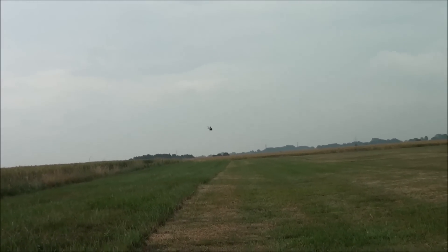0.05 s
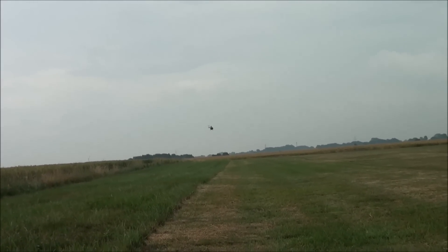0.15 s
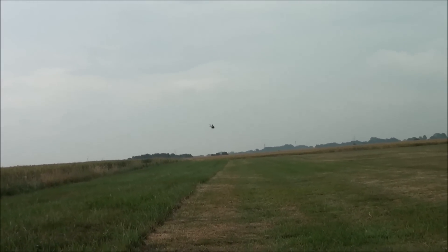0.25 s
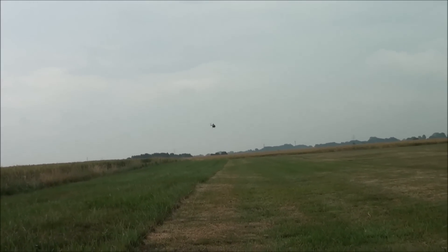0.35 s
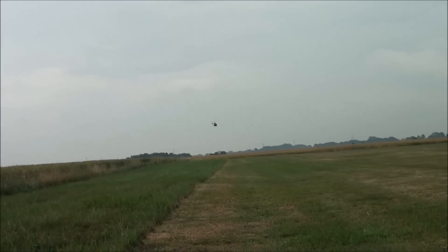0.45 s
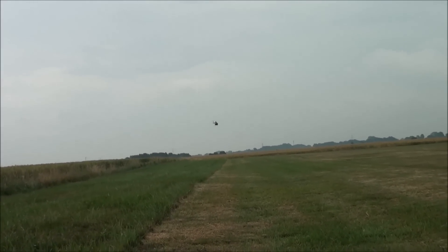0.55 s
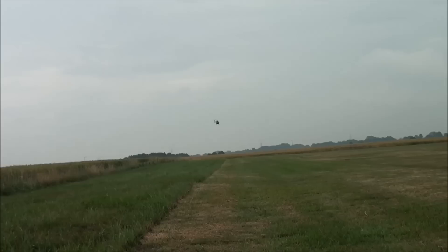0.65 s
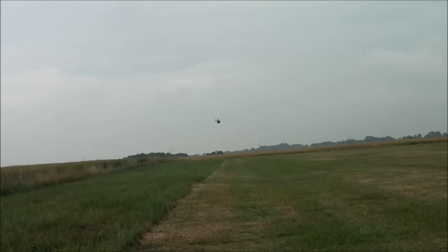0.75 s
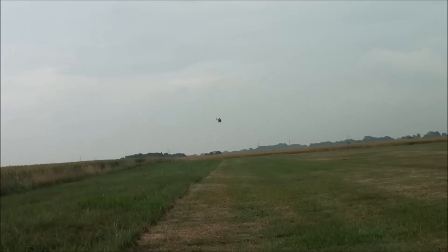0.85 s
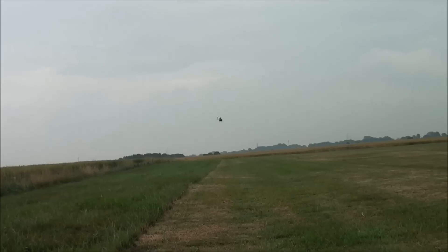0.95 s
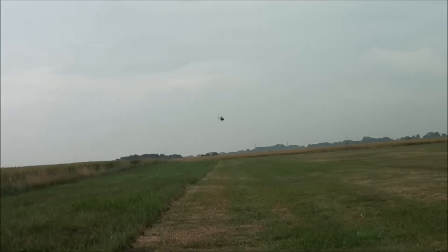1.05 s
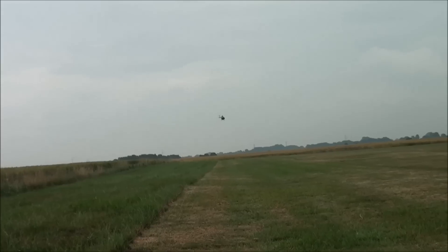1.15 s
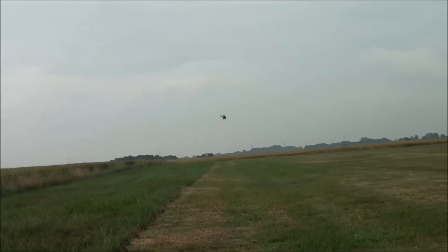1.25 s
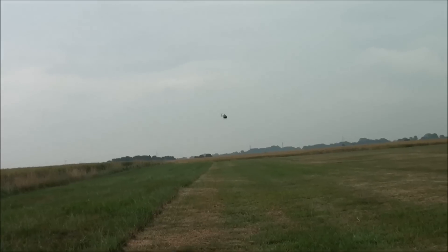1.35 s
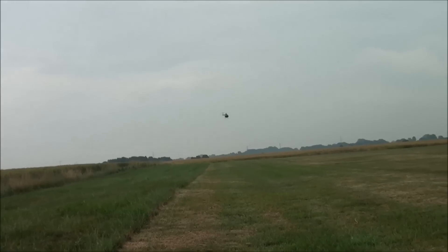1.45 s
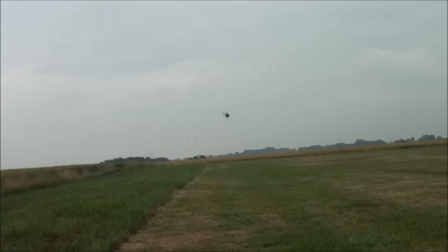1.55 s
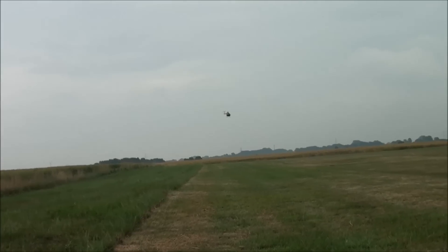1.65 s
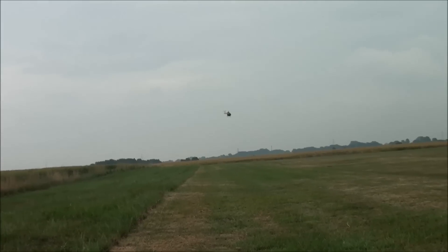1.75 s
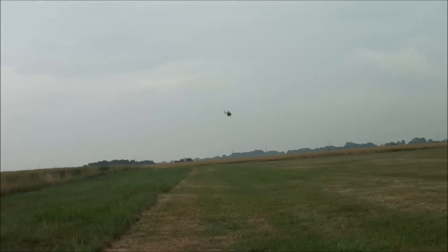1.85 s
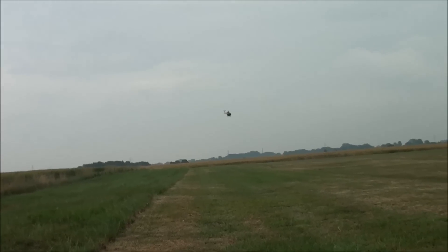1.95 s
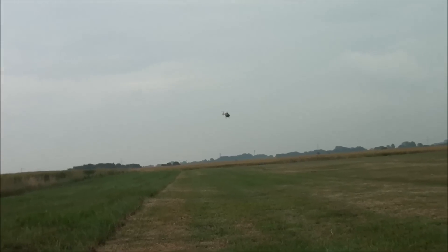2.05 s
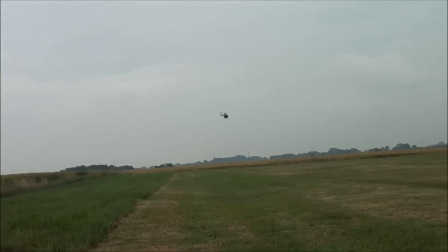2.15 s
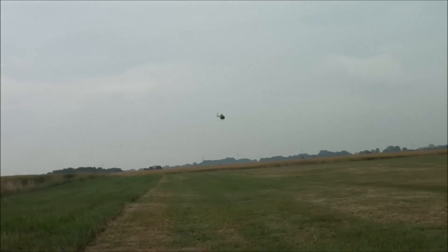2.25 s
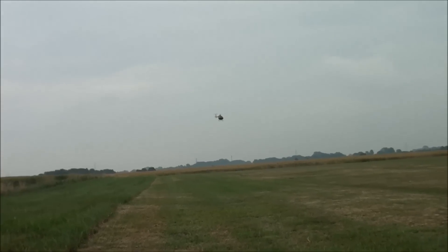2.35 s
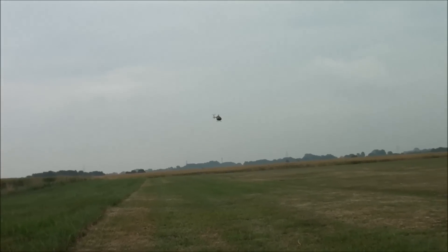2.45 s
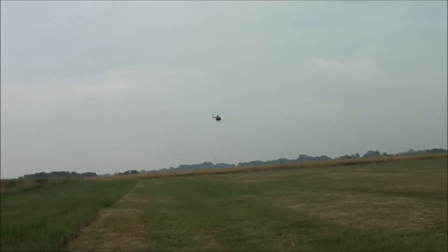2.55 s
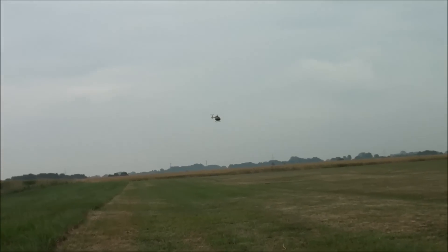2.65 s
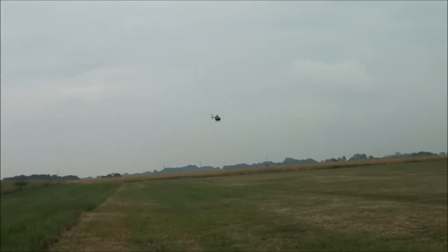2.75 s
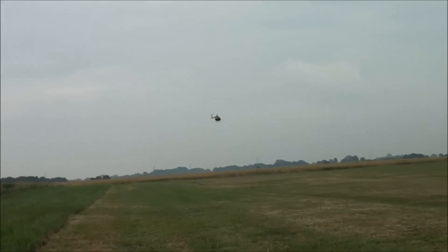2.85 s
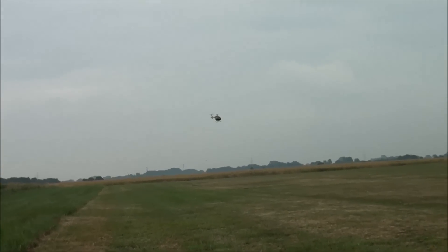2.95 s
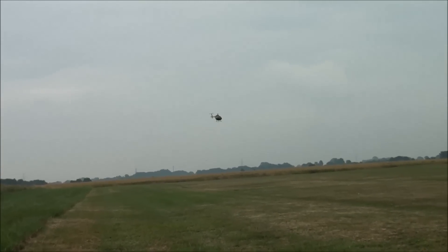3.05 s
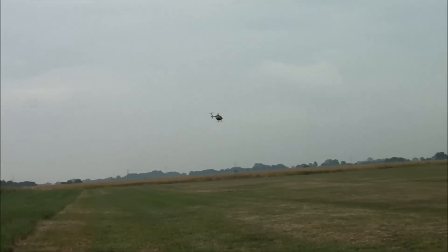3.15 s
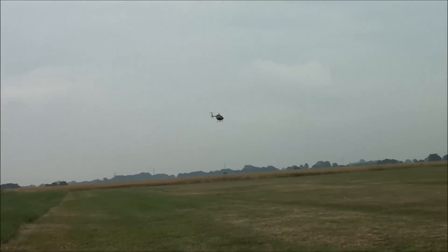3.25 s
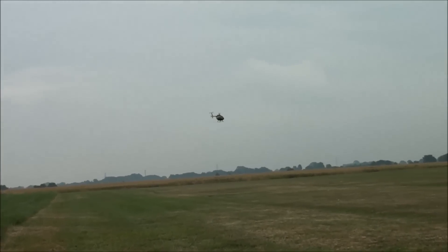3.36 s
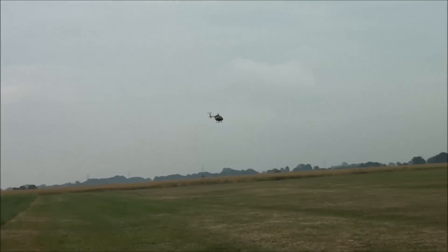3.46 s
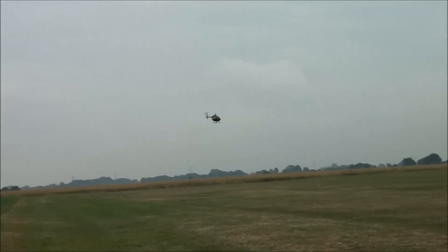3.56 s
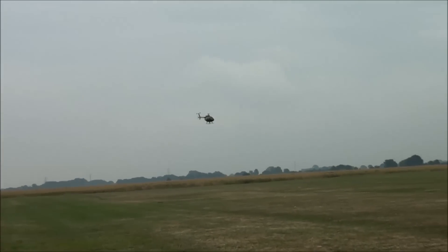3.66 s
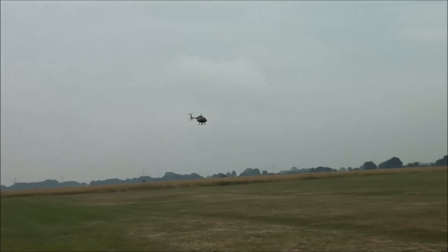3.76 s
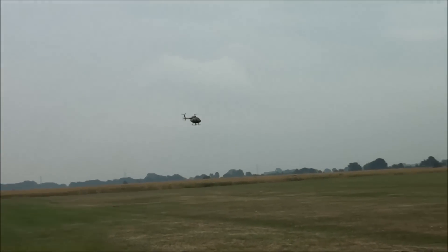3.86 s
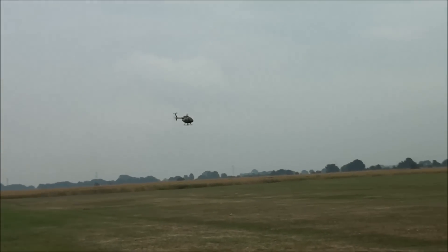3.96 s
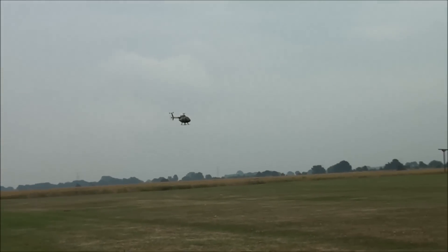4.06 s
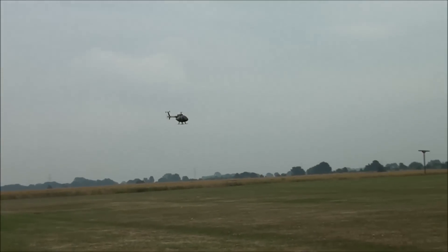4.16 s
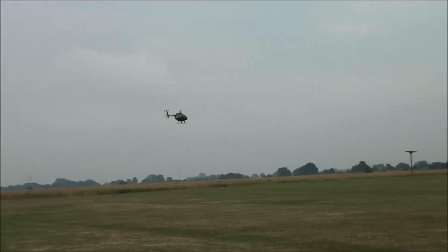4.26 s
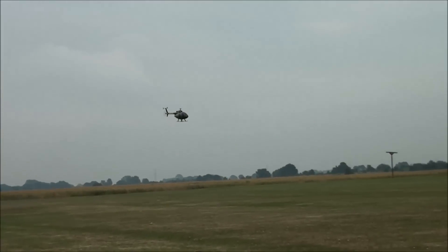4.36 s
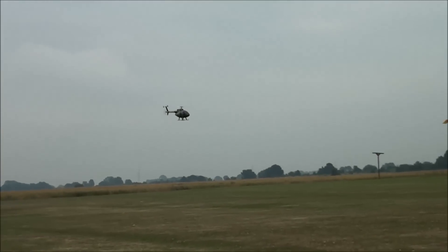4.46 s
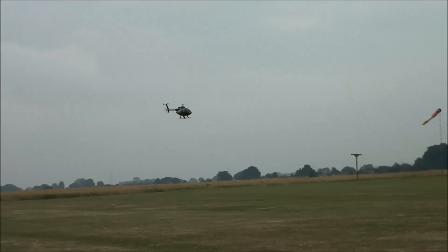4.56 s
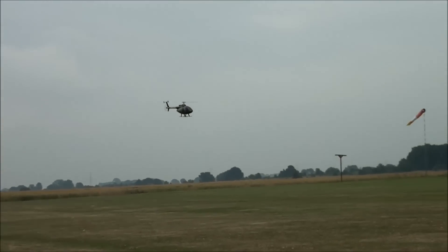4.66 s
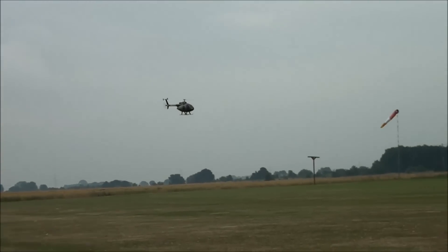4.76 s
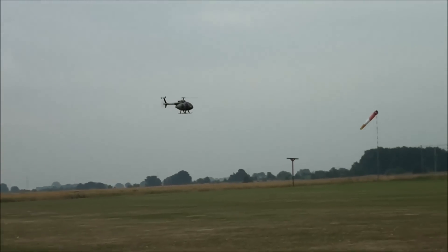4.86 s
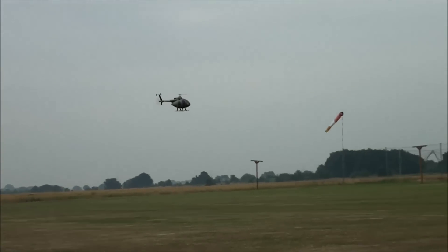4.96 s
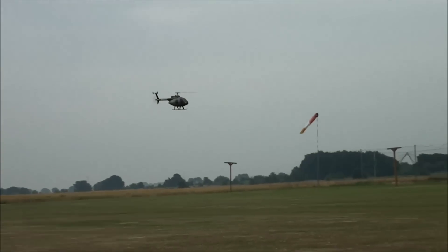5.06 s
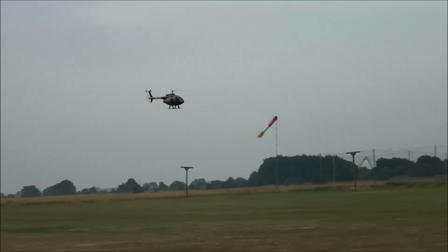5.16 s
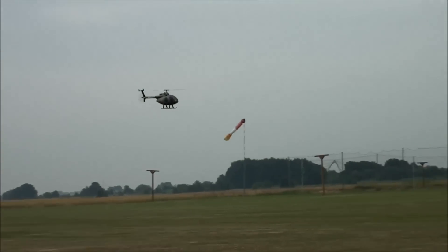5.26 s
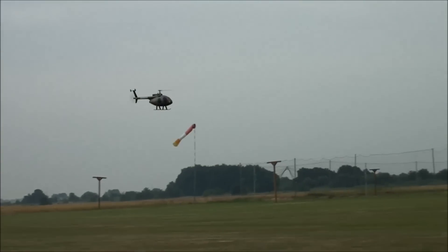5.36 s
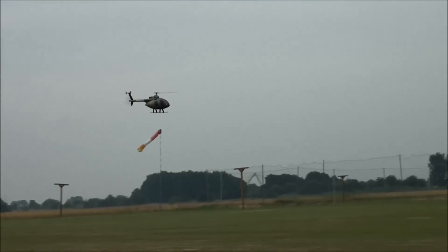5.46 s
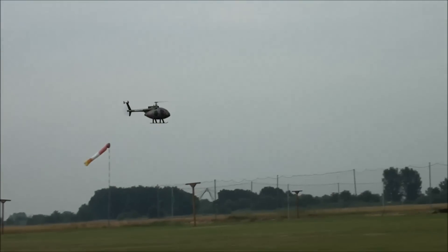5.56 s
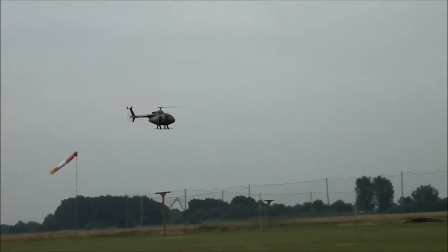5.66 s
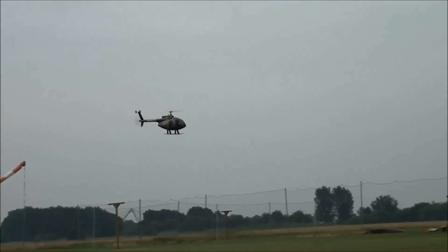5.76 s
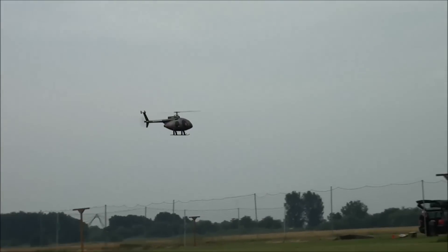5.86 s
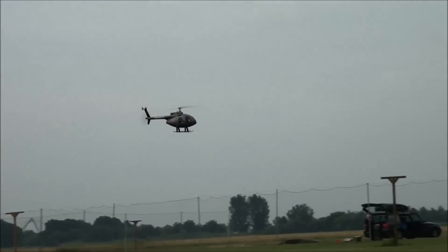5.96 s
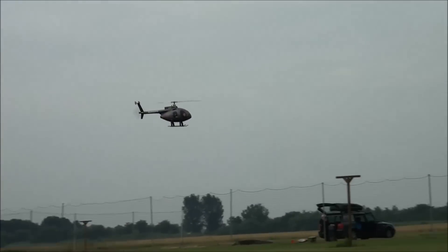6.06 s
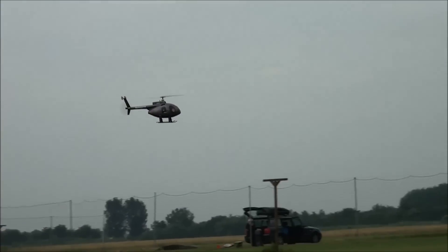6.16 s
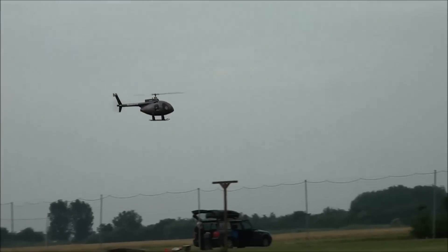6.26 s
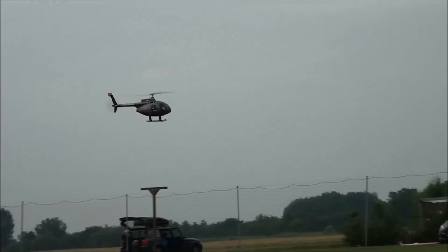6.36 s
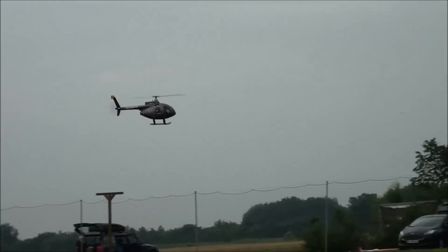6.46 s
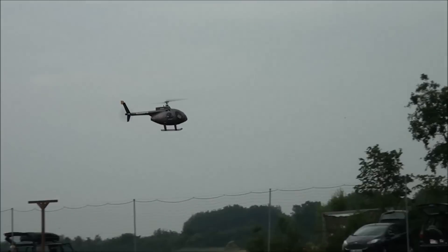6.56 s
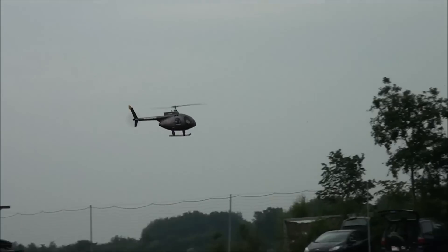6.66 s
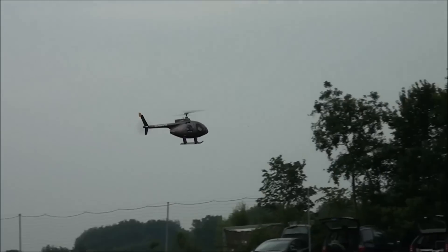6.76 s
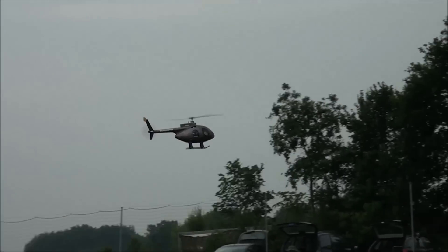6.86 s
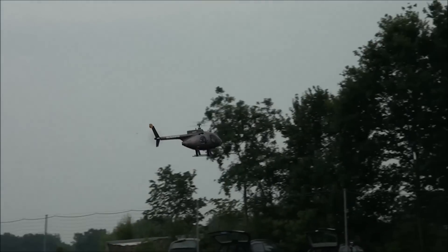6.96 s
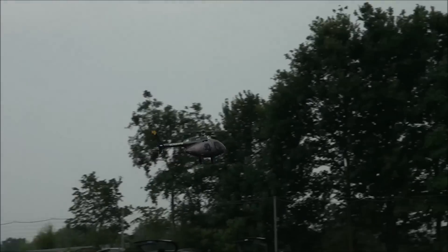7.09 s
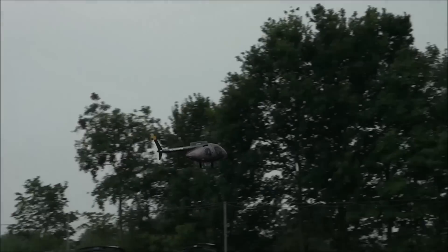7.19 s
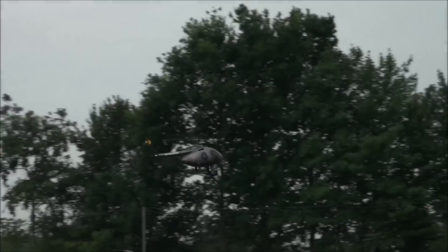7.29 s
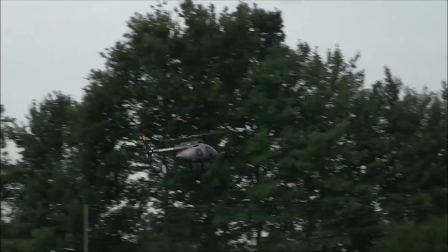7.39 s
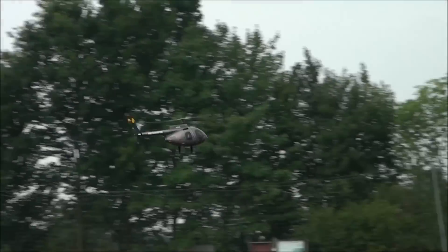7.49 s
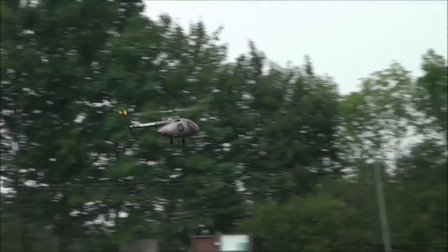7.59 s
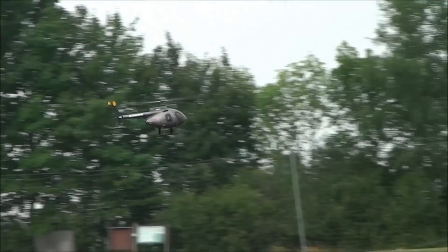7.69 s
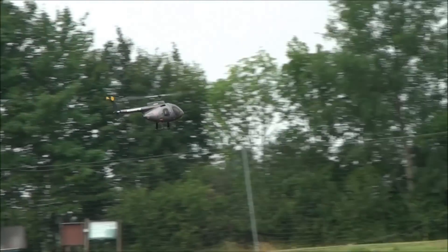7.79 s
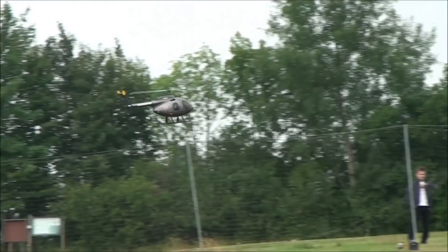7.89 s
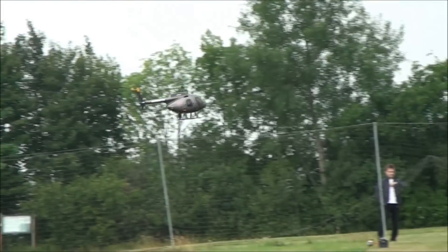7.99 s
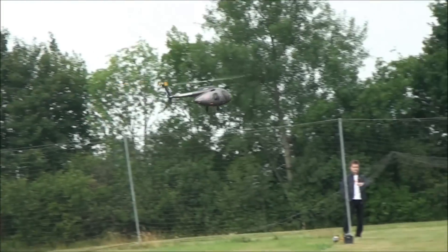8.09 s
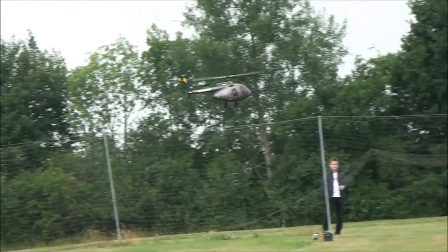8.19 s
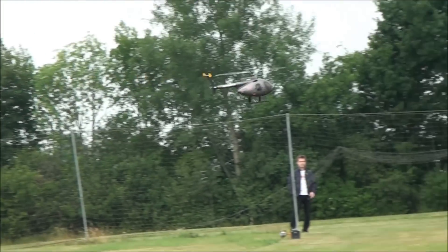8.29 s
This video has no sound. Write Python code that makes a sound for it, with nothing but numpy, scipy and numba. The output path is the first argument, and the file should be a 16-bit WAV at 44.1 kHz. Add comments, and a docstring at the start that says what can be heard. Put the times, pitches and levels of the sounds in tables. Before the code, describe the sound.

An electric model helicopter flies in over an open field with a thin, high whine, a hissing gear rattle and a soft rush of blades. It grows somewhat louder, takes on a sweeping, hollow tone and drops slightly in pitch as it passes. Wind on the microphone is faint at first, then builds after about three seconds into irregular low rumbles and slaps, loudest in the last part.

```python
"""An electric model helicopter comes in low over a grass field and passes by. Its gear mesh whines,
tooth errors rattle with every rotor turn, the blades rush and thump, and the tail rotor hums.
The echo off the grass sweeps notches through the sound. Wind rumbles and flutters on the two
microphone ports, building to buffets and slaps; two faint taps sit underneath."""
import sys
import numpy as np
from scipy import signal
from scipy.fft import rfft, irfft, next_fast_len
from scipy.io import wavfile
from scipy.ndimage import uniform_filter1d, minimum_filter1d, map_coordinates
from numba import njit

SR = 44100
rng = np.random.default_rng(int(sys.argv[2]) if len(sys.argv) > 2 else 0)


def persist_wave(psi):
    """Save psi, clipped to +-1, as 16-bit WAV."""
    counts = np.round(np.clip(psi, -1, 1) * 32767).astype(np.int16)
    wavfile.write(sys.argv[1], SR, np.atleast_2d(counts).T)


N = 367353

# Whine pitch, dropping as the craft passes: t/s, f/Hz
WHINE_PITCH = [(0, 5206), (.45, 5202), (1.1, 5208), (2.0, 5213), (3.5, 5222), (4.8, 5214), (5.45, 5194),
               (6.55, 5155), (7.0, 5132), (7.7, 5111), (8.0, 5103), (8.33, 5105)]
# Whine fader, ahead of the grass echo: t/s, level/dB
WHINE_FADER = [(0.0, -37.5), (0.45, -39.5), (1.1, -29.5), (1.6, -36), (2.0, -33.5), (2.8, -30), (3.6, -27),
               (4.4, -29), (5.0, -27.5), (5.6, -31), (5.85, -36), (6.5, -31.5), (6.9, -29.5), (7.7, -31),
               (8.1, -30.5), (8.33, -31.5)]
# How the craft faces us: t/s, facing (0 nose on, 1 side on, 2 from behind, 3 banking away)
HEADING = [(2.6, -0.5), (3.6, 0.74), (5.25, 2.06), (5.55, 2.5), (7.95, 2), (8.2, 3.5)]
# Noise faders, ahead of trims: t/s, gear noise level/dB, rush level/dB, gear top-end send/dB
NOISE_FADERS = [(0.0, -39.5, -37.5, -3.5), (1.0, -28.5, -32.5, -11), (1.8, -35, -36, -6),
                (2.0, -31.5, -36, -12.5), (2.44, -33.5, -35, -9.5), (2.76, -30, -36.5, -9),
                (3.29, -31.5, -36, 0), (3.6, -27.5, -37, -7), (4.1, -29, -34, -10), (5.66, -25.5, -30, -12),
                (7.2, -28, -33, -1.5), (7.7, -30.5, -36.5, -15), (8.33, -29.5, -35, -12)]
# EQ of the gear rattle and hiss: f/Hz, gain/dB
GEAR_EQ = [(2000, -12.5), (3400, -8), (3910, -2), (4280, -7.5), (4620, -8), (4930, -21), (5220, 2.5),
           (6290, -8.5), (6830, -2.5), (8440, -1), (9900, 0.5), (10800, -0.5), (12700, -23.5),
           (14700, -6.5), (15700, -10.5)]
# Tones in the rattle: multiple of the rotor rate, relative level/dB for facings 0-2
GEAR_TONES = [(86, -30, -27, -18), (88, -21, -26, -27), (91, -21, -28, -27), (99, -31, -25, -19),
              (106, -19, -18, -22), (110, -15, -17, -18), (154, -26, -22, -20), (192, -18, -20, -17),
              (194, -28, -25, -17), (198, -18, -16, -19), (221, -17, -19, -21), (232, -20, -13, -22),
              (238, -16, -24, -24), (253, -20, -20, -15), (343, -26, -21, -21)]
# EQ of the blade rush: f/Hz, gain/dB
RUSH_EQ = [(120, -40), (200, -18), (559, -3), (700, -0.5), (1280, -5.5), (1430, -2.5), (2010, -6),
           (4000, -7.5), (5200, -1), (8800, -120)]
# Lag of the bounce off the grass: t/s, delay/ms
ECHO_LAG = [(0, .05), (1.0, .052), (1.3, .1), (1.6, .14), (2.0, .165), (2.36, .192), (2.7, .23),
            (3.1, .245), (3.4, .285), (4.3, .245), (4.9, .258), (5.4, .31), (5.75, .335), (6.1, .385),
            (6.55, .42), (7.2, .39), (7.6, .34), (8.33, .315)]
# Pinion side tone and mesh overtone: multiple of the mesh rate, level/dB re whine for facings 0-2
WHINE_PARTIALS = [(12 / 11, -19, -19.5, -14), (4, -27, -3, -14)]
# Tail hum: multiple of its blade rate, level/dB re rush fader for facings 0-3
TAIL_PARTIALS = [(2, -8, -13, -19, -5), (3, -17, -10, -12, -10.5), (4, -13, -13, -10.5, -16),
                 (5, -13, -22, -10.5, -10), (6, -31, -15.5, -22.5, -25), (7, -34, -16, -17, -17)]
# Rotor thump and pinion beat: multiple of the rotor rate, level/dB (multiple 11 is the pinion's own turn)
THUMP_PARTIALS = [(2, -48.5), (4, -52.5), (8, -57), (10, -58), (11, -57)]
# Slow wind bed: t/s, rumble level/dB, flutter level/dB re rumble
WIND_BED = [(0.0, -52, 2.5), (2.95, -48.5, 0.5), (3.1, -30.5, -24), (3.4, -24, -16), (3.64, -30, -11),
            (3.94, -17, -18), (4.89, -29.5, -13.5), (5.2, -23, -26), (5.47, -23, -14), (5.59, -37, -14),
            (5.68, -21.5, -10), (5.92, -13, -6.5), (6.14, -12.5, -1.5), (6.25, -28.5, 5.5),
            (6.7, -24.5, -13), (6.87, -24.5, 4), (7.2, -24, 3), (7.3, -19, -2), (7.5, -22, -0.5),
            (8.33, -32, -31)]
# Faint taps: t/s, f/Hz, level/dB, decay/ms
TAP_CUES = [(.106, 920, -24, 1.6), (3.7212, 2900, -6, .15)]
# Buffets over the bed: t/s, hold/s, rumble level/dB, flutter level/dB re rumble
BUFFET_CUES = [(.88, 0.071, -42, -22), (1.18, 0.12, -39, -22), (2.347, 0.067, -34, -12),
               (2.58, .03, -37.5, -12), (2.797, .05, -34.5, -11), (3.063, 0.012, -22.5, -21),
               (3.324, 0.038, -16.5, -5.5), (3.41, 0.1, -19, -19), (3.682, 0.053, -12, -11),
               (6.263, 0.097, -13, 3), (6.397, 0.15, -20.5, -10), (6.926, 0.054, -25, -13),
               (7.3, .14, -10.5, -5), (7.498, 0.45, -14.5, -5.5), (7.868, 0.29, -10.5, -7.5),
               (8.214, .1, -17, -30)]
# Single slaps of wind: t/s, peak level/dB, f/Hz
SLAP_CUES = [(3.094, -9.5, 99), (3.358, -6.5, 195), (3.708, -14, 147), (4.127, -6.5, 130), (4.31, -9, 170),
             (5.349, -10, 239), (5.448, -10.5, 156), (5.929, -3, 240), (5.974, -3, 151), (6.149, 0, 195),
             (6.286, -8, 398), (6.462, -6, 181), (6.836, -6.5, 312), (6.957, -7, 277), (7.342, -2, 301),
             (7.513, -5.5, 221), (7.908, -7, 190), (8.029, -11, 184), (8.092, -1, 258), (8.244, -7, 94.2)]

TEETH, TAIL_BLADES = 121, 8.155  # main gear teeth and tail blades passing per rotor turn
NOISE_BOUNCE, TONE_BOUNCE = .72, .8  # share the grass reflects at a grazing angle
TIME = np.arange(N) / SR


def undb(db):
    return 10 ** (np.asarray(db) / 20)


def unit(x):
    return x / np.sqrt(np.mean(x ** 2))


def curves(table):
    """One automation lane per column, ramping between the cue times."""
    times, *columns = np.transpose(table)
    return [np.interp(TIME, times, column) for column in columns]


def cut(x, order, hz, kind="low"):
    """Low-pass or high-pass filter."""
    return signal.sosfilt(signal.butter(order, hz, kind, fs=SR, output="sos"), x)


def equalise(x, points):
    """EQ through (f/Hz, gain/dB) points; rms 1."""
    hz, db = np.transpose(points)
    size = next_fast_len(N)
    bin_hz = np.arange(size // 2 + 1) * SR / size
    gain = undb(np.interp(np.log(bin_hz + 1), np.log(hz), db))
    return unit(irfft(rfft(x, size) * gain, size)[:N])


@njit
def bandpass(x, hz, width):
    """Sweepable state-variable band-pass; width is 1/Q."""
    out, band, low = np.empty(len(x)), 0., 0.
    for i in range(len(x)):
        g = np.tan(np.pi * hz[i] / SR)
        v = (band + g * (x[i] - low)) / (1 + g * (g + width))
        out[i] = width * v
        band, low = 2 * v - band, low + 2 * g * v
    return out


def drift(rate_hz):
    """Smoothed sample-and-hold modulator; spread near 1."""
    hold = int(SR / rate_hz)
    steps = np.repeat(rng.standard_normal(N // hold + 1), hold)
    return 1.09 * uniform_filter1d(uniform_filter1d(steps, hold), hold)[:N]


def tone(cycles, rms_db):
    return np.sqrt(2) * undb(rms_db) * np.sin(2 * np.pi * cycles)


def beam_db(facing, levels):
    """Crossfades a partial's levels as the craft turns."""
    return np.interp(facing, np.arange(len(levels)), levels)


def throb_db(turns, facing):
    """Tremolo that peaks at its own spot in the rotor turn, a little more every other turn."""
    angle = 2 * np.pi * (turns + rng.random())
    return (2.5 + 1.4 * np.minimum(facing, 2)) * (np.cos(angle) + .18 * np.cos(angle / 2))


def tooth_rattle(turns, morph_hz=1.6, scatter_db=3.0, knock_db=1.5):
    """Tooth errors come round every turn, some knocking harder; the pattern slowly morphs."""
    count, size = 40, 8192  # one-turn patterns, samples in each
    draws = rng.standard_normal((count, 400, 2))
    harmonics = (draws[..., 0] + 1j * draws[..., 1]) * undb(scatter_db * rng.exponential(size=400))
    knocks = np.repeat(rng.standard_normal((count, 32)), size // 32, axis=1)
    knocks = uniform_filter1d(knocks, size // 32, axis=1, mode="wrap")
    patterns = np.pad(irfft(harmonics, size) * undb(knock_db * knocks), ((0, 0), (0, 1)), "wrap")
    morph = np.clip(TIME * morph_hz, 0, count - 1)
    return unit(map_coordinates(patterns, [morph, turns % 1 * size], order=1))


def gear_noise(turns, facing, top_db):
    """Rattle, hiss and tones of the gears; the wheel runs out of true, so the noise swells each turn."""
    swell = undb((1.1 + .3 * facing) * np.cos(2 * np.pi * turns) + .8 * np.cos(4 * np.pi * turns))
    gears = swell * equalise(undb(2) * tooth_rattle(turns) + rng.standard_normal(N), GEAR_EQ)
    for multiple, *levels in GEAR_TONES:
        cycles = multiple * turns + rng.random()
        level_db = beam_db(facing, levels) - 1.5 + 2.6 * drift(2.435)
        gears += tone(cycles, level_db + throb_db(turns, facing))
    # at the closest point the low gear band chops once a turn
    closeness = np.exp(-((TIME - 6.1) / .8) ** 2)
    low_band = bandpass(gears, np.full(N, 4500.), .55)
    gears += .6 * closeness * low_band * (undb(throb_db(turns, facing)) - 1)
    # the top end is beamed and flickers in the moving air
    flicker = undb(2.5 * drift(22) + 3.6 * drift(7))
    top = cut(gears, 4, 11800, "high")
    return gears - top + unit(top * swell * flicker) * undb(top_db)


def blade_rush(turns, facing, nose_cut=.55):
    """Air rushing off the blades with a trace of rattle, duller nose on."""
    rush = equalise(rng.standard_normal(N) + undb(-22) * tooth_rattle(turns), RUSH_EQ)
    return rush - nose_cut * np.clip(1 - facing, 0, 1) * cut(rush, 2, 2200, "high")


def grass_echo(direct, path_ms):
    """The grazing bounce comes back upside down and combs the direct sound."""
    lag_ms = path_ms * (1 + .02 * drift(14))  # rough ground, moving air
    echo = map_coordinates(direct, [np.arange(N) - lag_ms * SR / 1000], order=3)
    echo = signal.sosfiltfilt(signal.butter(1, 16000, fs=SR, output="sos"), echo)  # grass eats treble
    share = NOISE_BOUNCE - .75 * lag_ms  # steeper paths lose more
    return (direct - share * echo) / np.sqrt(1 + share ** 2)


def grass_db(hz, lag_ms):
    """A tone meets its inverted echo and dips where the lag is a whole number of cycles."""
    phase = 2 * np.pi * hz * lag_ms / 1000
    return 10 * np.log10(1 + TONE_BOUNCE ** 2 - 2 * TONE_BOUNCE * np.cos(phase))


def mesh_whine(turns, facing, mesh_hz, lag_ms):
    """Meshing teeth sing, fluttering once a turn; the 11-tooth pinion adds a side tone above."""
    fader_db = curves(WHINE_FADER)[0]
    cycles = TEETH * turns + .072 * drift(40)
    flutter_db = 1.5 * np.cos(2 * np.pi * turns) + 1.1 * drift(18)
    whine = tone(cycles, fader_db + grass_db(mesh_hz, lag_ms) + flutter_db)
    for multiple, *levels in WHINE_PARTIALS:
        level_db = fader_db + beam_db(facing, levels) + grass_db(multiple * mesh_hz, lag_ms)
        whine += tone(multiple * cycles, level_db + 2.5 * drift(2.5) + throb_db(turns, facing))
    return whine


def tail_hum(turns, facing, rotor_hz, lag_ms, fader_db):
    """The tail rotor hums on wavering harmonics of its blade rate."""
    cycles = TAIL_BLADES * turns + .057 * drift(14)
    hum = np.zeros(N)
    for multiple, *levels in TAIL_PARTIALS:
        hz = multiple * TAIL_BLADES * rotor_hz
        level_db = fader_db + beam_db(facing, levels) + grass_db(hz, lag_ms)
        waver_db = 1.6 * drift(18) + 1.2 * drift(1.5)
        hum += tone(multiple * cycles + .11 * multiple ** 2, level_db + waver_db)
    return hum


def rotor_thump(turns):
    """The main rotor beats softly on low harmonics of its turn; the 11-tooth pinion, turning eleven times as
    fast, adds a beat of its own."""
    return sum(tone(multiple * turns, db + 3 * drift(14)) for multiple, db in THUMP_PARTIALS)


def helicopter():
    """Every layer locks to the rotor; scatter off the field adds a little stereo width."""
    mesh_hz, facing, lag_ms = curves(WHINE_PITCH)[0], curves(HEADING)[0], curves(ECHO_LAG)[0]
    gear_db, rush_db, top_db = curves(NOISE_FADERS)
    rotor_hz = mesh_hz / TEETH
    turns = np.cumsum(rotor_hz) / SR
    gears = gear_noise(turns, facing, top_db) * undb(gear_db)
    rush = blade_rush(turns, facing) * undb(rush_db)
    direct = gears * undb(2.5 + 1.17 * drift(14)) + rush * undb(.5 + .5 * drift(8.1))
    combed = grass_echo(direct, lag_ms)
    whine = mesh_whine(turns, facing, mesh_hz, lag_ms)
    mid = combed + whine + tail_hum(turns, facing, rotor_hz, lag_ms, rush_db) + rotor_thump(turns)
    scatter = np.roll(rush + undb(-4) * whine, SR // 30)
    side = undb(-19) * cut(scatter, 2, 5600)
    return np.array([mid + side, mid - side])


def eddies(hz, width, lump_db, side_db, lag_ms):
    """Lumpy noise round a wandering pitch: eddies hit the left port first and change on the way."""
    centre_hz = np.clip(np.clip(hz, 30, 900) * undb(2 * drift(15)), 20, 3000)
    streams = [bandpass(rng.standard_normal(N), centre_hz, width) for _ in range(2)]
    shared, side = [unit(bandpass(x, centre_hz, width) * undb(lump_db)) for x in streams]
    late = np.interp(TIME - lag_ms / 1000, TIME, shared)
    return np.array([shared + undb(side_db) * side, late - undb(side_db) * side])


def wind(rumble_db, flutter_db, breeze_db=-55):
    """Large eddies rumble, small ones flutter, and a light breeze never stops."""
    lumps = drift(45) + .82 * drift(130)
    rumble_hz = 112 + 1.56 * (rumble_db + 18.5)
    flutter_hz = 254 + 5.4 * (flutter_db + 32)  # stronger gusts shed smaller eddies
    rumble = eddies(rumble_hz, width=2.2, lump_db=2.2 * lumps, side_db=-16, lag_ms=.5)
    flutter = eddies(flutter_hz, width=1.1, lump_db=3.8 * lumps, side_db=-15, lag_ms=.3)
    breeze = eddies(40, width=1.5, lump_db=2.5 * lumps, side_db=-20, lag_ms=.3)
    return undb(rumble_db) * rumble + undb(flutter_db) * flutter + undb(breeze_db) * breeze


def taps():
    """Each tap is a tight, damped ring."""
    out = np.zeros(N)
    for start, hz, db, decay_ms in TAP_CUES:
        age = np.maximum(TIME - start, 0)
        out += undb(db) * np.sin(2 * np.pi * hz * age) * np.exp(-age * 1000 / decay_ms)
    return out


def buffet_levels(rise_s=.032, fall_s=.031, sag_db_per_s=43.5):
    """Rumble and flutter levels in dB: buffets rise out of the wind bed, sag and fall."""
    bed_db, bed_flutter_db = curves(WIND_BED)
    rumble, flutter = undb(bed_db), undb(bed_db + bed_flutter_db)
    for start, hold_s, db, flutter_db in BUFFET_CUES:
        age = TIME - start
        gate = np.interp(age, np.cumsum([0, rise_s, hold_s, fall_s]), [0, 1, 1, 0])
        envelope = gate ** 2 * undb(db - sag_db_per_s * np.clip(age, 0, 1))
        rumble = np.hypot(rumble, envelope)
        flutter = np.hypot(flutter, envelope * undb(flutter_db))
    return 20 * np.log10(rumble), 20 * np.log10(flutter)


def slaps():
    """Each slap of wind pushes the microphone membrane through a cycle or two."""
    out = np.zeros(N + SR)
    age = np.arange(SR // 10) / SR
    for start, db, hz in SLAP_CUES:
        push = np.sin(2 * np.pi * hz * age) * np.exp(-age * hz / 1.1)
        onset = int(start * SR)
        out[onset:onset + len(age)] += undb(db) * push / push.max()
    return out[:N]


def scene():
    """The fly-by, with wind filling the low end and the taps in the centre."""
    craft = helicopter()
    air = wind(*buffet_levels()) + slaps()
    return craft + cut(air, 4, 900) + taps()


def record(dry, ceiling=.97, top_hz=15750):
    """A limiter ducks the loudest gusts for a few milliseconds; a steep filter cuts the top."""
    window = SR // 100
    gain = np.minimum(1, ceiling / np.abs(dry).max(axis=0))
    gain = uniform_filter1d(minimum_filter1d(gain, window), window)
    return signal.sosfilt(signal.ellip(10, .2, 80, top_hz, fs=SR, output="sos"), dry * gain)


dry = scene()
out = record(dry)
persist_wave(out)
```